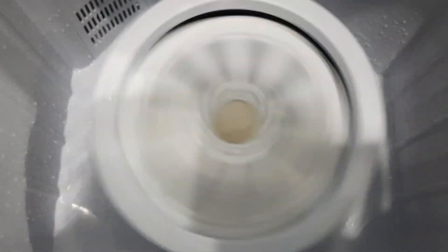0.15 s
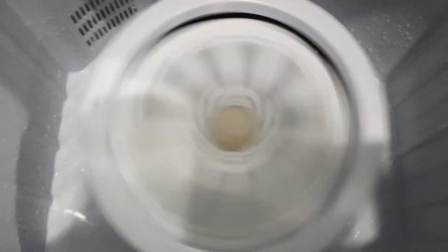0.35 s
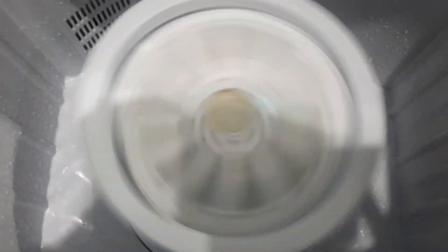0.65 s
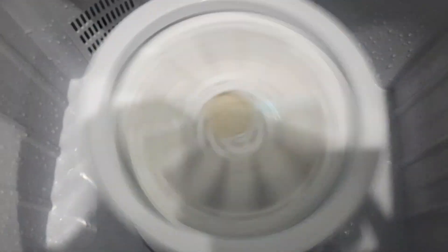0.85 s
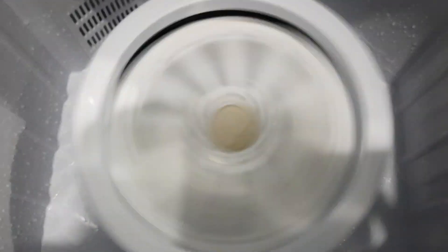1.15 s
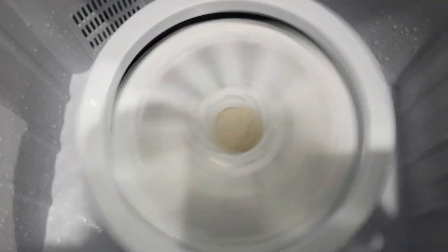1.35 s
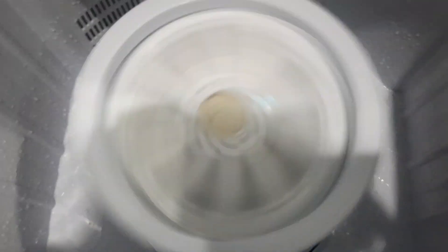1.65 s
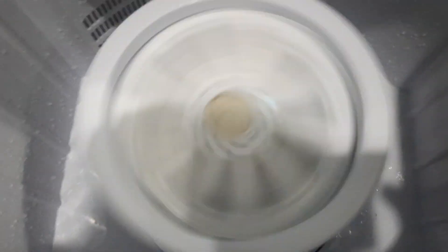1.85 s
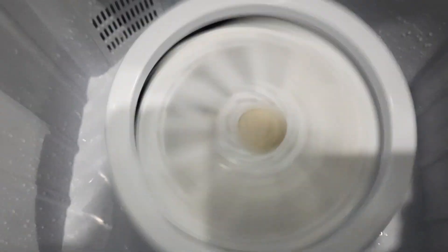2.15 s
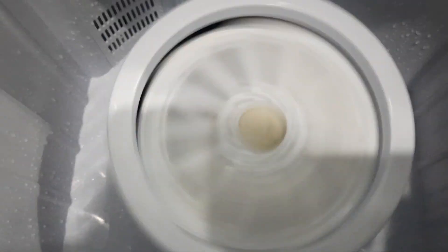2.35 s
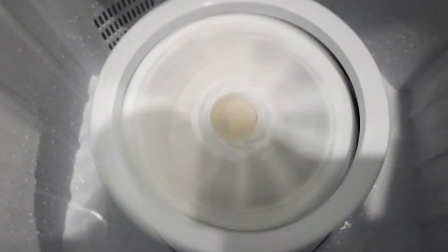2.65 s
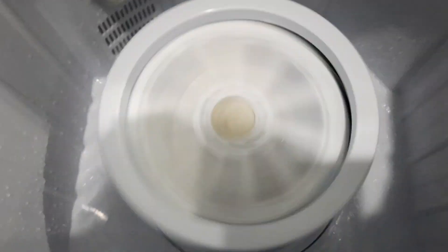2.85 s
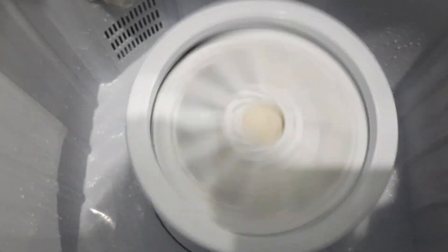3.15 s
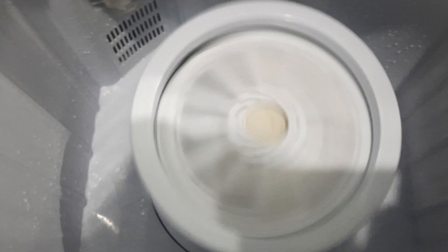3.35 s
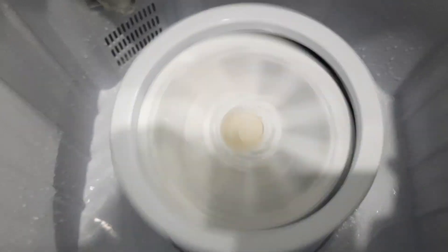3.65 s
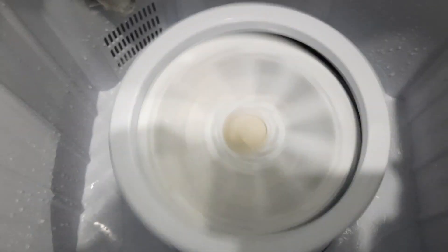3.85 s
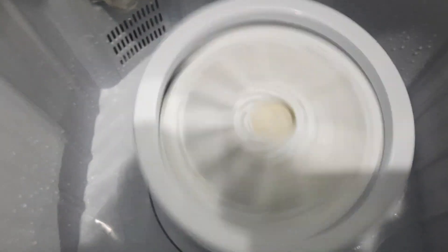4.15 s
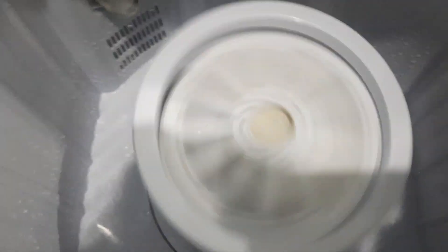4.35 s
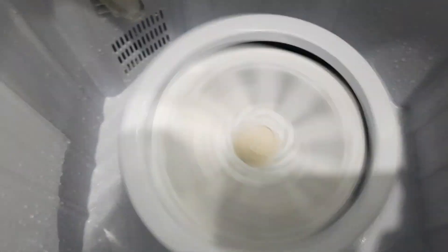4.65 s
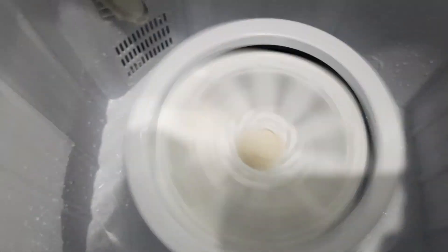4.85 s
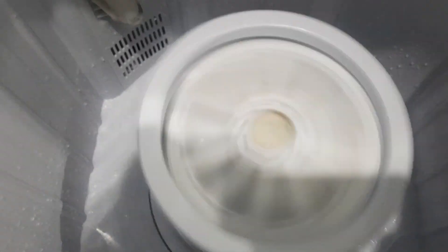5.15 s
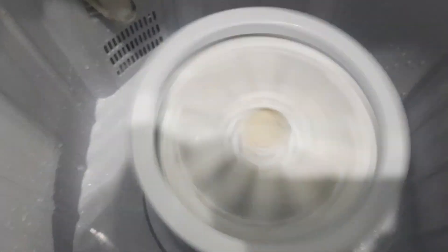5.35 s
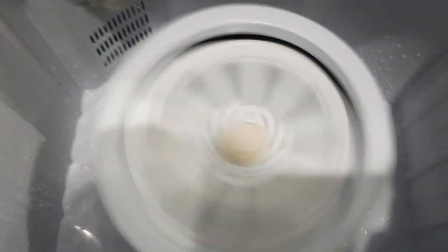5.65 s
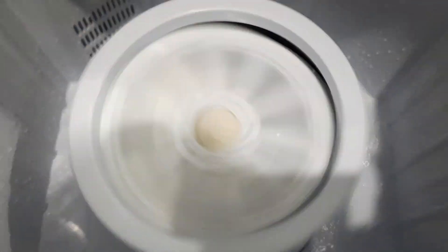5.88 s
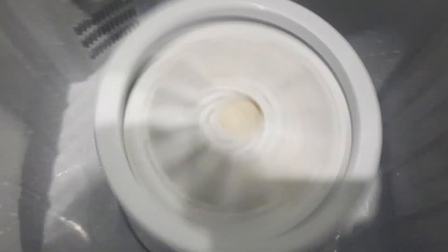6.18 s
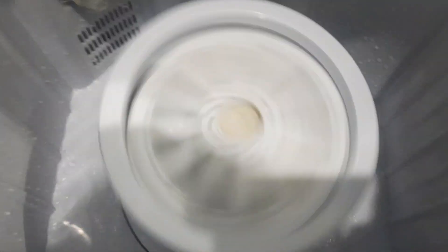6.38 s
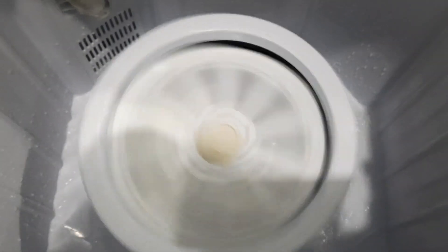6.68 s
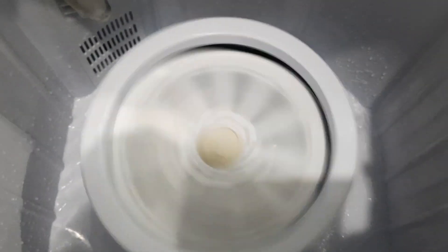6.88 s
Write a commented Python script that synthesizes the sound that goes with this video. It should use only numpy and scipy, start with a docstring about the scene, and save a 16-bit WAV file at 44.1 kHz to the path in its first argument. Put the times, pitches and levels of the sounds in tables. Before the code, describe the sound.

A top-loading washing machine spins with its lid open. About five times a second the off-centre basket knocks hard on the tub, follows with a quick cluster of taps and scraping, then runs free for an instant. A few dull bumps join in during the first half. Air hisses with each turn and the motor rumbles steadily underneath, heard close from just above the tub.

```python
"""Knocks and rattles, about five rounds a second: a top-loading washing machine spins slowly, lid open.
Every turn the off-centre basket knocks hard on the tub, taps and rubs round it in the same order, then
runs free for a moment. The blows make the cabinet, tub and rim ring, and the open tub throws them back.
A few dull bumps join in, air hisses past the rim, and the motor rumbles underneath.
Two microphones listen from just above."""
import sys
import numpy as np
from scipy import signal
from scipy.fft import rfft, irfft
from scipy.io import wavfile
from scipy.ndimage import uniform_filter1d

SR = 44100
rng = np.random.default_rng(int(sys.argv[2]) if len(sys.argv) > 2 else 0)


def transcribe(signal):
    """Save signal, clipped to [-1, 1], as a 16-bit WAV file at the path in sys.argv[1]."""
    frames = np.atleast_2d(signal).T
    limited = np.clip(frames, -1, 1)
    pcm = np.round(limited * 32767).astype(np.int16)
    wavfile.write(sys.argv[1], SR, pcm)


N = 309582

# The basket's blows in one turn; the fourth is the hard knock. (time after the knock [s],
# cabinet level [dB], tub level [dB], tub pitch struck [Hz], rim level [dB], rim pitch struck [Hz])
TURN_BLOWS = [(-.0212, -21, -11.5, 540, -36, 3100), (-.0120, -14.5, -19, 1080, -30, 4100),
              (-.0045, -28.5, -20.5, 740, -33, 3280), (-.0002, -68, -5.5, 1102, -19.5, 3800),
              (.0085, -30, -28.5, 1300, -24, 3900), (.0240, -31, -17.5, 680, -21, 3300),
              (.0325, -21.5, -13.5, 605, -20, 3370), (.0480, -25.5, -24.5, 870, -33, 2550),
              (.0620, -25.5, -19.5, 860, -31, 3260), (.0740, -22, -18.5, 1470, -21.5, 4630),
              (.0870, -26, -30, 795, -38, 3130), (.0965, -20.5, -21, 1760, -17, 4656),
              (.1070, -17.5, -16.5, 590, -36, 3050), (.1190, -24, -23.5, 1360, -33.5, 2930),
              (.1410, -27, -26.5, 790, -37, 2880)]
# Modes, the tones each part rings with when hit. (pitch [Hz], time to fade by 60 dB [s], level [dB])
CABINET_MODES = [(63, 0.32, -28), (80.2, 0.63, -6.5), (143, 0.082, -2), (175.5, 0.071, -3.5),
                 (175.6, 0.05, -7), (245.6, 0.11, -2), (289, 0.052, 2.5), (370, 0.027, 5)]
TUB_MODES = [(534, 0.034, -5.5), (611.5, 0.11, -9.5), (923, 0.042, -12.5), (1017, 0.023, -1.5),
             (1082, 0.053, -0.5), (1216, 0.046, -0.5), (1347, 0.05, -8), (1516, 0.022, 1), (1708, 0.017, 2),
             (1820, 0.08, -13.5), (1970, 0.019, -3.5), (2080, 0.03, -16)]
RIM_MODES = [(2290, 0.012, 1), (2582, 0.032, 3), (2967, 0.0094, 11.5), (3106, 0.075, -6), (3402, 0.02, 2.5),
             (3560, 0.031, 0), (3840, 0.0088, 9), (4140, 0.0057, 6), (4516, 0.037, -8.5)]
# Heavier bumps of the tub on the cabinet. (time [s], level [dB], pitch struck [Hz])
TUB_BUMPS = [(0.826, -15, 166), (2.249, -13, 163), (2.452, -10, 163), (2.491, -13.5, 270),
             (2.662, -10, 164), (2.86, -15, 282), (2.896, -12.5, 272), (3.100, -24, 272)]
# How the hiss of air and spray swells over one turn. (time after the knock [s], level [dB])
AIR_SWELL = [(0, -31.5), (0.017, -42.5), (.035, -38.5), (0.104, -38), (.130, -42), (0.171, -48.5),
             (0.196, -38.5), (.204, -40.5)]
# Bright hiss of air. The last rows are not the air itself but the sound equipment's treble cut-off
# near 16 kHz. (pitch [Hz], relative level [dB])
HISS_WITH_CUTOFF = [(2500, 0), (4500, -3), (5400, -5), (8090, -6.5), (9460, -13), (12500, -7.5),
                    (15000, -13.5), (15850, -14), (16000, -40), (17000, -50)]
# Tone colour of the rattle and the motor, from bass to treble. (pitch [Hz], relative level [dB])
RATTLE_COLOUR = [(50, -52), (120, 12.5), (250, -9), (600, 7), (1100, 1.5), (2000, 3), (3400, -5.5),
                 (4500, -1), (5500, -46), (9000, -45), (16000, -60)]
MOTOR_COLOUR = [(25, -31), (45, 5.5), (70, -1.5), (110, 9.5), (160, 10), (230, -6.5), (404, -7.5),
                (614, -3.5), (730, -16), (1420, -10), (2270, -17.5), (3710, -25), (5780, -74), (9000, -44),
                (16000, -65)]
# How alike a noise is at the two microphones. (pitch [Hz], likeness [0 to 1])
STEREO_LIKENESS = [(25, .95), (300, .95), (640, .85), (1000, .4), (1400, 0), (15000, 0)]
# The right microphone compared with the left. (pitch [Hz], level [dB])
RIGHT_LEVEL = [(60, -3), (400, -2.5), (1300, -6), (2400, -7), (4400, -5), (8100, -5), (15000, -4)]

FIRST_KNOCK_S, TURN_S, QUICKER_S_PER_TURN, TURN_COUNT = -.0958, .2038, 1.1e-5, 36
# How fast a blow weakens away from the pitch struck. (cabinet, tub, rim) [dB per octave]
TAP_FOCUS, KNOCK_FOCUS = (12.5, 9.1, 155), (7.4, 15.8, 5)
RIGHT_LAG_S = .0002  # blows on tub and rim reach the right microphone this much later


def knock_times():
    """When the hard knock lands, in seconds; each turn is a little quicker than the last."""
    turn = np.arange(TURN_COUNT)
    return FIRST_KNOCK_S + turn * (TURN_S - QUICKER_S_PER_TURN * turn / 2)


def basket_blows(tap_drift_s=.0005, tap_waver_db=2.5, knock_waver_db=.06, cabinet_hz=192):
    """The basket hits the same spots every turn; the taps drift a little, the knock stays steady."""
    after, cabinet_db, tub_db, tub_hz, rim_db, rim_hz = np.tile(TURN_BLOWS, (TURN_COUNT, 1)).T
    chance = rng.standard_normal((TURN_COUNT, len(TURN_BLOWS), 4))
    chance = unit_level(uniform_filter1d(chance, 3, axis=0))  # neighbouring turns are alike
    chance = chance.reshape(-1, 4).T
    is_knock = abs(after) < .002
    drift = np.where(is_knock, 0, tap_drift_s) * chance[0]
    times = np.repeat(knock_times(), len(TURN_BLOWS)) + after + drift
    waver = np.where(is_knock, knock_waver_db * chance[1], tap_waver_db * chance[1:])
    cabinet_db, tub_db, rim_db = np.array([cabinet_db, tub_db, rim_db]) + waver
    right_db = np.where(is_knock, -46, -2)  # the knock is almost all on the left
    focus = np.where(is_knock[:, None], KNOCK_FOCUS, TAP_FOCUS).T
    cabinet_signs, tub_signs, rim_signs = push_directions(is_knock)
    cabinet = strike(CABINET_MODES, times, cabinet_db, cabinet_hz, focus[0], cabinet_signs)
    tub = strike(TUB_MODES, times, tub_db, tub_hz, focus[1], tub_signs, RIGHT_LAG_S, right_db)
    rim = strike(RIM_MODES, times, rim_db, rim_hz, focus[2], rim_signs, RIGHT_LAG_S, right_db)
    return cabinet + tub + rim


def push_directions(is_knock):
    """Each spot pushes a mode in (-1) or out (+1), the same way every turn: [blow, mode, side]."""
    one_turn = rng.choice([-1., 1.], (len(TURN_BLOWS), len(TUB_MODES), 2))
    signs = np.tile(one_turn, (TURN_COUNT, 1, 1))
    signs[is_knock, :, 0] = 1
    alike = signs[..., [0, 0]]  # deep modes push the same way on both sides
    mode_hz = np.transpose(TUB_MODES)[0]
    tub = np.where(mode_hz[:, None] < 1000, alike, signs)
    # High modes alternate in and out under the knock, so it swells instead of clicking.
    alternating = (-1.) ** np.arange(len(TUB_MODES))
    tub[is_knock, :, 0] *= np.where(mode_hz > 1100, alternating, 1)
    rim = signs * np.where(is_knock[:, None, None], alternating[:, None], 1)
    return alike, tub, rim


def strike(modes, times, db, struck_hz, focus, signs, lag_s=RIGHT_LAG_S / 2, right_db=0):
    """Blows ring every mode of a part; modes far from the pitch struck are up to 17 dB weaker."""
    sound, pad = np.zeros((2, N + SR)), SR // 2
    for k, (hz, fade_s, mode_db) in enumerate(modes):
        level_db = db + mode_db - np.minimum(focus * abs(np.log2(hz / struck_hz)), 17)
        for side in range(2):  # 0 is left, 1 is right
            at = np.round((times + side * lag_s) * SR).astype(int) + pad
            pushes = gain_of(level_db + side * (right_db + look_up(RIGHT_LEVEL, hz))) * signs[:, k, side]
            sound[side] += ring(np.bincount(at, pushes, N + SR), hz, fade_s)
    # A part gives off little sound outside the range of its modes.
    band = signal.butter(3, [.7 * modes[0][0], 1.12 * modes[-1][0]], "bandpass", fs=SR, output="sos")
    return signal.sosfilt(band, sound)[:, pad:pad + N]


def ring(blows, hz, fade_s):
    """One mode: each blow starts a pure tone that fades by 60 dB in fade_s."""
    decay, step = np.exp(-np.log(1000) / (fade_s * SR)), 2 * np.pi * hz / SR
    return signal.lfilter([0, decay * np.sin(step)], [1, -2 * decay * np.cos(step), decay ** 2], blows)


def tub_echoes(blows, left_right_db=(-10.5, -11), fade_s=.059, lowest_hz=860):
    """The open tub throws each blow back as a short, dense flutter, different at each microphone."""
    t = np.arange(3000) / SR
    bounces = rng.choice([-1., 1.], (2, len(t))) * (rng.random((2, len(t))) < .06)
    bounces *= gain_of(-60 * t / fade_s)
    bounces *= (gain_of(left_right_db) / np.linalg.norm(bounces, axis=1))[:, None]
    treble = signal.sosfilt(signal.butter(2, lowest_hz, "highpass", fs=SR, output="sos"), blows[0])
    return signal.oaconvolve(treble[None], bounces, axes=1)[:, :N]


def cabinet_bumps():
    """The tub bumps the cabinet: dull blows that ring only the cabinet."""
    times, db, hz = np.transpose(TUB_BUMPS)
    return strike(CABINET_MODES, times, db, hz, focus=43, signs=np.ones((len(times), len(CABINET_MODES), 2)))


def rub_strength(after, rub_db=-29.5, flare_db=-13.5, flare_fade_s=.036, early_s=.019, let_go_s=.12):
    """The basket touches just before the knock, rubs hardest at it, holds on, then lets go."""
    letting_go = gain_of(-600 * np.maximum(after - let_go_s, 0))  # 600 dB a second
    held = np.where(after > TURN_S - early_s, 1, letting_go)
    return gain_of(rub_db) * held + gain_of(flare_db - 60 * after / flare_fade_s)


def basket_rattle(ticks_per_s=3000, spread_db=3, repeat_share=.68, ringing_db=-3):
    """Rubbing makes tiny ticks that ring tub and rim; some return at the same spot every turn."""
    after = since_knock()
    ticks = rng.choice([-1., 1.], (4, N))
    ticks *= gain_of(spread_db * np.minimum(rng.exponential(1, (4, N)), 3))
    ticks *= rng.random((4, N)) < ticks_per_s / SR
    repeating, fresh = ticks[:2, (after * SR).astype(int)], ticks[2:]
    strength = rub_strength(after)
    scrape = (np.sqrt(repeat_share) * repeating + np.sqrt(1 - repeat_share) * fresh) * strength
    ringing = sum(gain_of(db) * ring(scrape, hz, fade_s) for hz, fade_s, db in TUB_MODES + RIM_MODES)
    rattle = unit_level(scrape) + gain_of(ringing_db) * unit_level(ringing)
    return np.sqrt(np.mean(strength ** 2)) * coloured(RATTLE_COLOUR, rattle)


def swept_air(patch_db=2, splash_db=1):
    """Air and spray sweep past the rim: a patchy, grainy hiss that swells with every turn."""
    hiss = coloured(HISS_WITH_CUTOFF, rng.standard_normal((2, N)))
    grid = signal.stft(hiss, nperseg=256, noverlap=192)[2]  # [side, pitch, time]
    patches = uniform_filter1d(rng.standard_normal(grid.shape[1:]), 25, axis=0)
    patches = unit_level(uniform_filter1d(patches, 12, axis=1))
    hiss = signal.istft(grid * gain_of(patch_db * patches), nperseg=256, noverlap=192)[1][:, :N]
    splashes = splash_db * np.minimum(wobble(400) ** 2, 4)
    swell_db = np.interp(since_knock(), *np.transpose(AIR_SWELL))
    return hiss * gain_of(swell_db + splashes)


def motor(rumble_db=-31.5, whine_hz=604, whine_db=-48):
    """The motor makes a steady rumble and one faint, wavering tone."""
    pitch = whine_hz * (1 + .00437 * wobble(4000))
    whine = np.sqrt(2) * gain_of(whine_db) * np.sin(2 * np.pi * np.cumsum(pitch) / SR)
    rumble = gain_of(rumble_db) * coloured(MOTOR_COLOUR, rng.standard_normal((2, N)))
    return rumble + whine * gain_of([[0], [-3]])  # the tone is softer on the right


def since_knock():
    """Seconds since the last hard knock, for every sample."""
    t, knocks = np.arange(N) / SR, knock_times()
    return t - knocks[np.searchsorted(knocks, t, "right") - 1]


def coloured(levels, noises):
    """Shapes two noises by a table of levels into a stereo pair, alike in the bass but not the treble."""
    hz = np.fft.rfftfreq(N, 1 / SR)
    likeness = look_up(STEREO_LIKENESS, hz)
    left, other = rfft(noises)
    right = (likeness * left + np.sqrt(1 - likeness ** 2) * other) * gain_of(look_up(RIGHT_LEVEL, hz))
    pair = irfft(np.array([left, right]) * gain_of(look_up(levels, hz)), N)
    return pair / np.sqrt(np.mean(pair[0] ** 2))


def look_up(table, hz):
    """A table's value at any pitch, sliding between its rows."""
    pitches, values = np.transpose(table)
    return np.interp(np.log(hz + 1), np.log(pitches + 1), values)


def wobble(samples):
    """A random wobble; the more samples it is smoothed over, the slower it moves."""
    return unit_level(uniform_filter1d(rng.standard_normal(N), samples))


def unit_level(x):
    """Scales a signal so its typical size (RMS) is 1."""
    return x / np.sqrt(np.mean(x ** 2) + 1e-20)


def gain_of(db):
    """Turns decibels into a number to multiply by."""
    return 10 ** (np.asarray(db) / 20)


def scene():
    """All the sounds of the machine together, left and right."""
    blows = basket_blows()
    return blows + tub_echoes(blows) + cabinet_bumps() + basket_rattle() + swept_air() + motor()


def record(dry):
    """The microphones thin the deepest bass, round off the loudest peaks and cut the very top treble."""
    thinned = signal.sosfilt(signal.butter(2, 45, "highpass", fs=SR, output="sos"), dry)
    rounded = thinned / (1 + (thinned / 1.05) ** 4) ** .25
    treble_cut = signal.firwin(511, 16480, window=("kaiser", 9), fs=SR)
    return signal.oaconvolve(rounded, treble_cut[None], "same")


dry = scene()
out = record(dry)
transcribe(out)
```